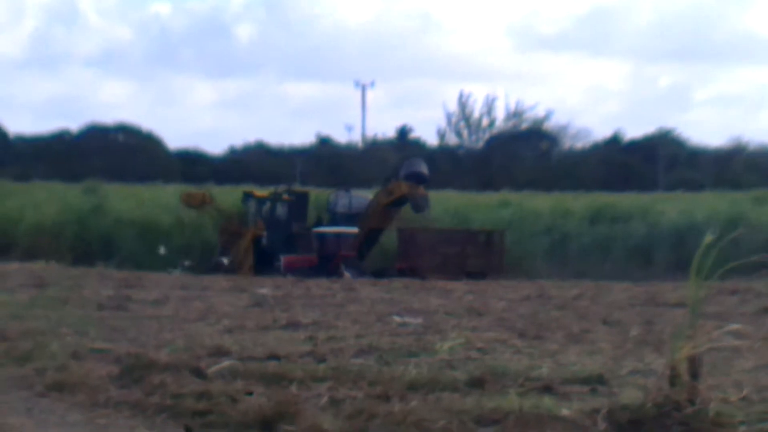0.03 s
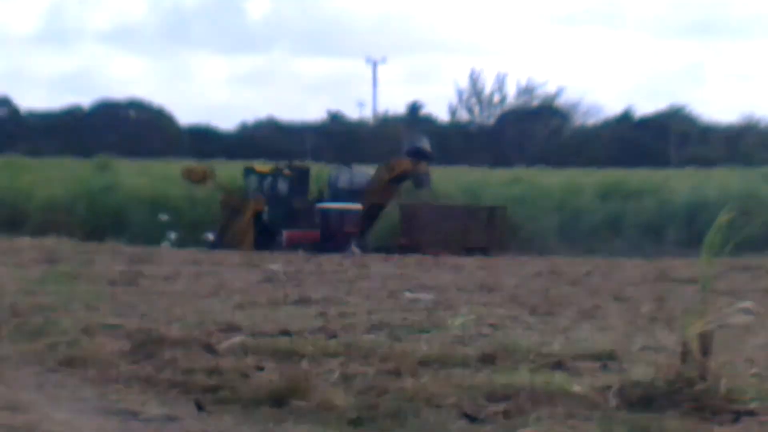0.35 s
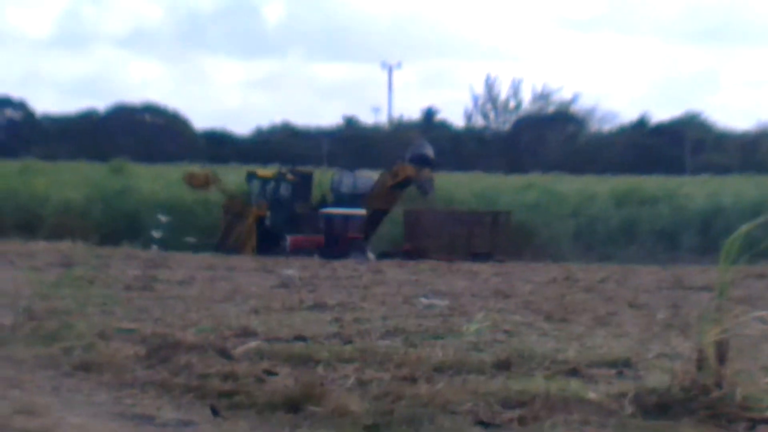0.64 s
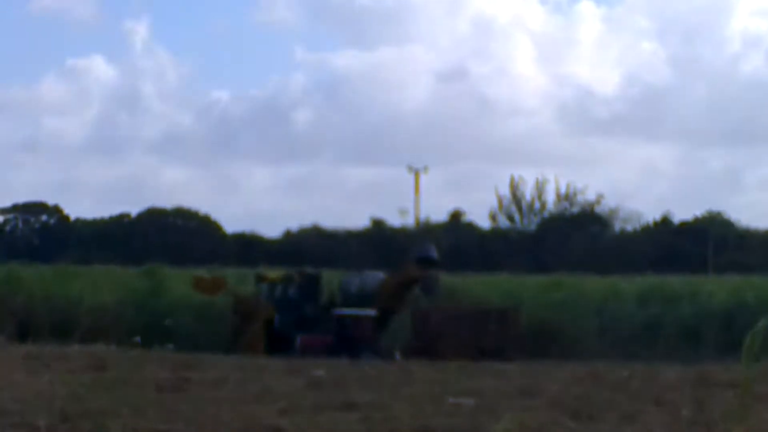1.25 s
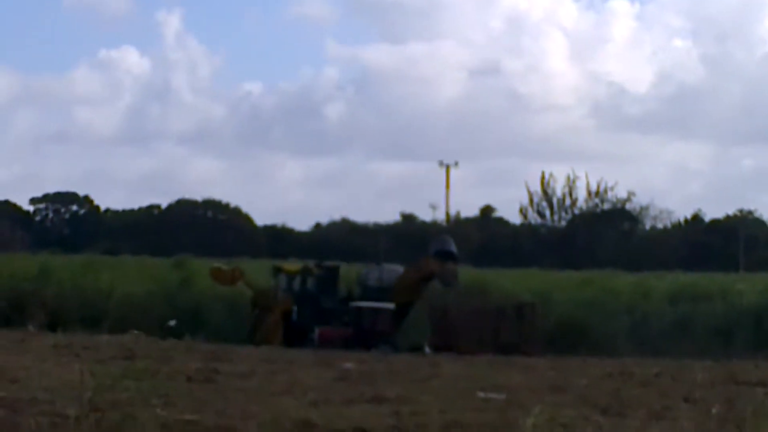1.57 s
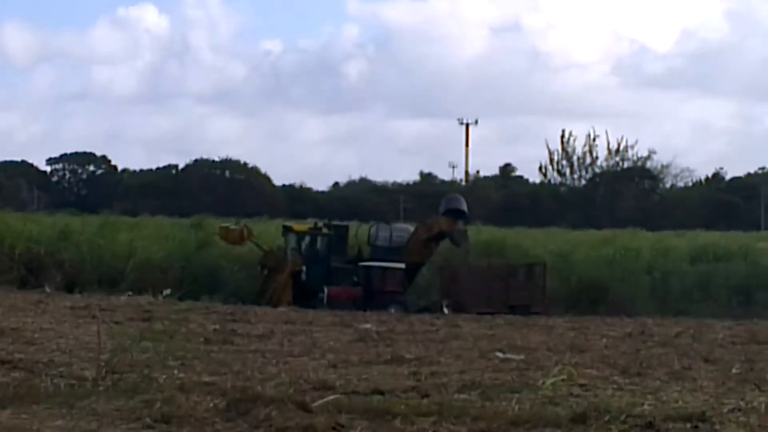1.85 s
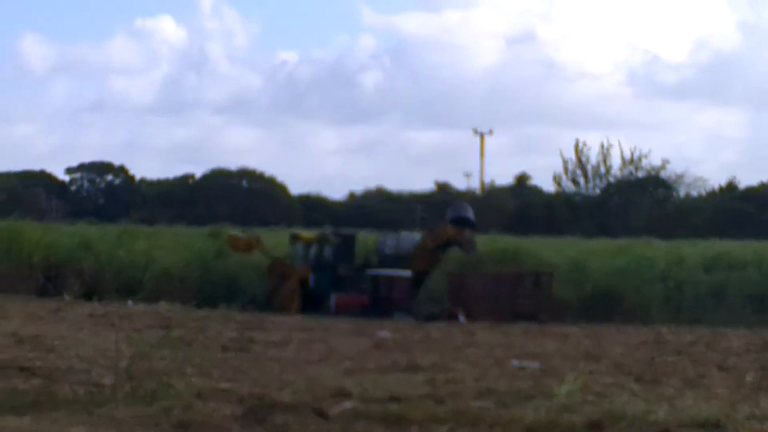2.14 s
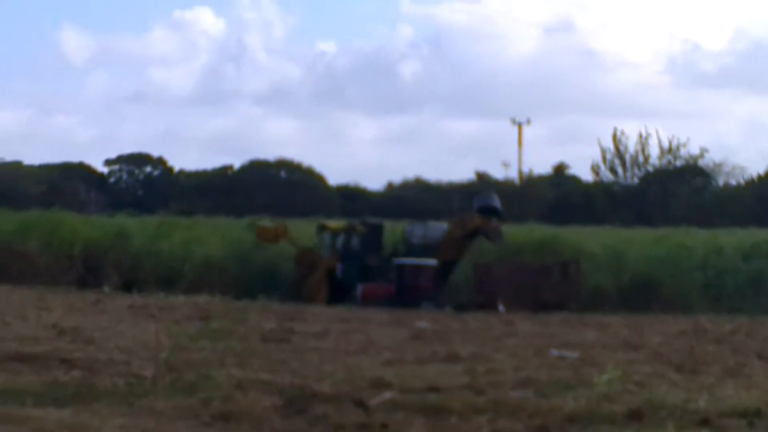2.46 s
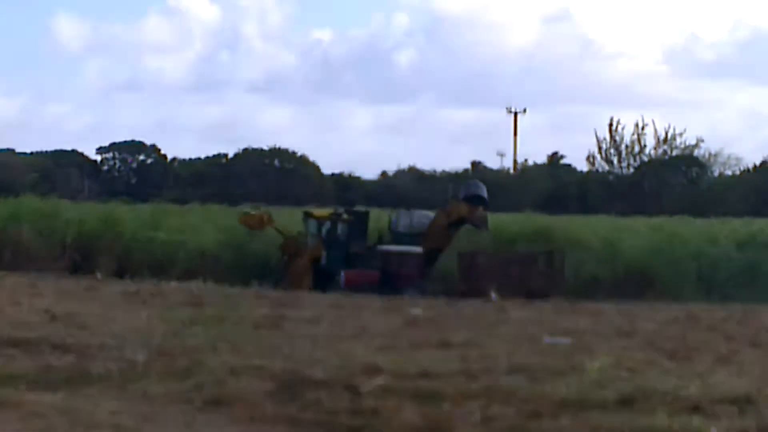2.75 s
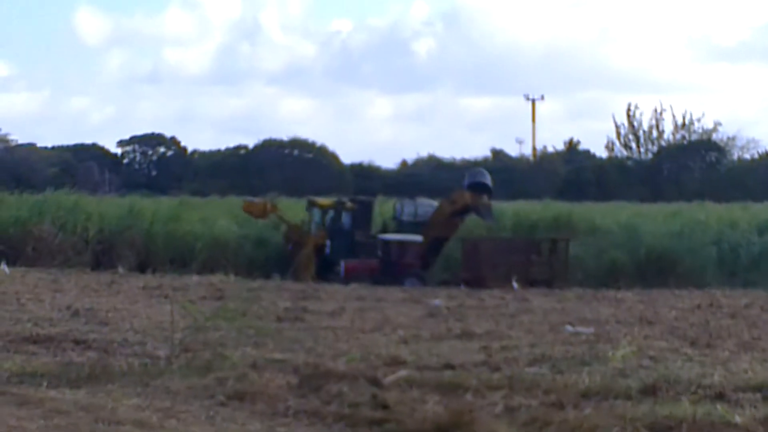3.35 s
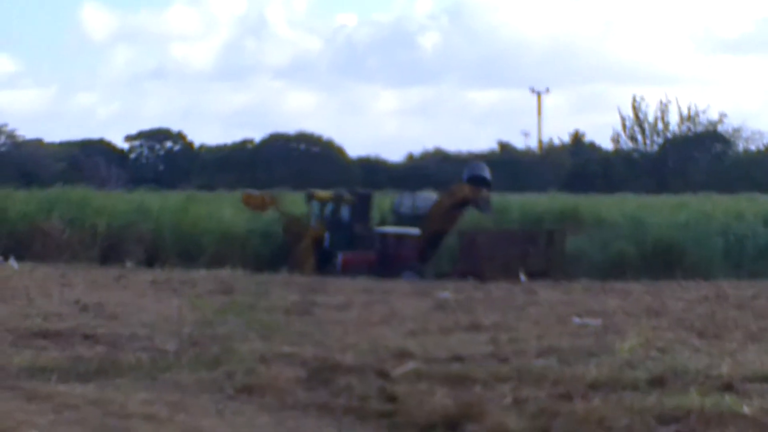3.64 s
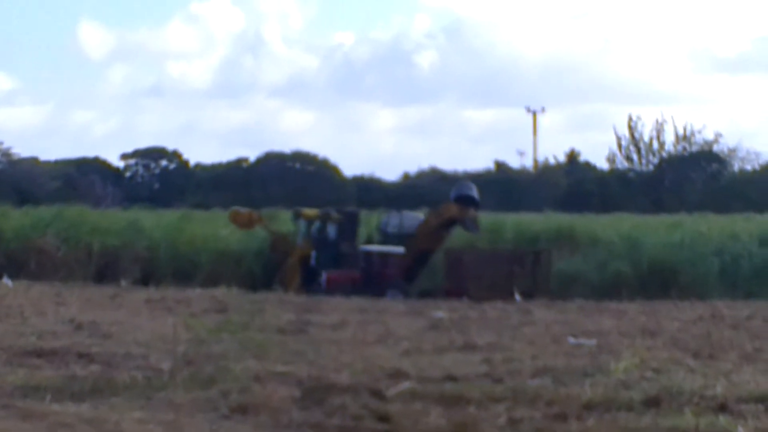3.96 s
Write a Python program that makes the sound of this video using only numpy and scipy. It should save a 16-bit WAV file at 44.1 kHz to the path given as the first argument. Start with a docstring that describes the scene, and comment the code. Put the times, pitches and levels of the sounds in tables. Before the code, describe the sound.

Wind sputters and thumps on the microphone while diesel farm machines drone far across a field.

```python
"""From the start, gusty wind buffets the microphone: a stream of eddies, each a short dip of pressure.
Far across the field a cane harvester and a tractor drone throughout: two diesel exhausts, roaring fans,
a thin whine and hissing leaves. The cutters' whirr stands out in the first half second, then sinks back.
A few dry rustles sound close by, the clearest at 1.6 s. From 3 s to the end the wind blows hardest,
and its eddies grow stronger and sharper."""
import sys
import numpy as np
from scipy import signal
from scipy.fft import rfft, irfft, next_fast_len
from scipy.io import wavfile
from scipy.ndimage import uniform_filter1d, map_coordinates

SR = 44100
rng = np.random.default_rng(int(sys.argv[2]) if len(sys.argv) > 2 else 0)


def store_pcm(level_fs):
    """Save levels as 16-bit WAV."""
    pcm = np.round(np.clip(level_fs, -1, 1) * 32767).astype(np.int16)
    wavfile.write(sys.argv[1], SR, np.atleast_2d(pcm).T)


N = 176400

# The bed of wind under the blasts. Each row: time in seconds, level in dB before its trim.
WIND_BED = [(0.0, -26.5), (0.2, -27), (0.33, -26), (0.46, -26), (0.57, -31.5), (0.67, -30), (0.76, -26),
            (0.97, -30.5), (1.15, -33), (1.36, -27.5), (1.48, -32), (1.74, -31), (1.95, -28.5),
            (2.15, -36.5), (2.45, -28), (2.86, -34.5), (2.95, -37.5), (3.0, -23.5), (3.03, -27.5),
            (3.1, -20.5), (3.24, -19.5), (3.285, -30.5), (3.35, -21), (3.42, -25), (3.47, -21.5),
            (3.62, -22), (3.68, -23.5), (3.79, -26), (3.84, -25.5), (3.95, -19.5), (4.0, -24)]
# Single blasts. Each row: peak time in seconds, swell level in dB before its trim, length in seconds,
# sharpness of the small eddies in Hz, depth of the core eddy in dB before the microphone colours it.
BLASTS = [(0.063, -21.5, 0.003, 500, -10.5), (0.089, -27.5, 0.007, 453, -23),
          (0.115, -35, 0.0053, 311, -5.5), (0.175, -32, 0.03, 448, -9), (0.18, -25.5, 0.015, 480, -13),
          (0.209, -22.5, .014, 325, -9), (0.227, -29.5, 0.0049, 484, -12), (0.274, -27.5, .008, 417, -19.5),
          (0.289, -29, 0.017, 405, -23), (0.33, -28.5, 0.022, 246, -16), (0.367, -31, 0.015, 330, -22),
          (0.405, -28.5, 0.018, 412, -26), (0.426, -20.5, 0.0041, 544, -7), (0.441, -21, 0.018, 270, -8),
          (0.449, -26.5, 0.0028, 485, -12), (0.489, -24.5, 0.0069, 474, -14),
          (0.517, -25.5, 0.0057, 483, -13.5), (0.541, -20.5, .008, 233.5, -16.5),
          (0.625, -23.5, 0.017, 271, -13), (0.698, -15, 0.011, 262, -21), (0.707, -18.5, .012, 448, -17),
          (0.716, -25, 0.007, 310, -13.5), (0.729, -25, 0.012, 450, -6.5),
          (0.741, -18.5, 0.009, 409, -14.5), (0.767, -28.5, 0.015, 406, -11), (0.789, -24, .014, 325, -27),
          (0.827, -19.5, 0.0044, 480, -16.5), (0.873, -23.5, 0.0065, 443, -15),
          (0.918, -30, 0.021, 556, -29), (1.18, -25.5, 0.0069, 446, -14), (1.263, -28, 0.037, 301, -25),
          (1.331, -29.5, 0.011, 480, -18), (1.355, -25, 0.0041, 610, -14.5), (1.391, -23, .018, 303, -20),
          (1.547, -20, .012, 536, -12.5), (1.868, -16, 0.015, 412, -10.5), (1.927, -20, 0.021, 424, -24.5),
          (1.97, -19, .012, 377, -14), (1.996, -22, 0.015, 425, -17.5), (2.093, -30.5, 0.016, 340, -11),
          (2.238, -25, 0.0097, 153, -12.5), (2.325, -24.5, 0.022, 343, -11), (2.349, -19, 0.0065, 404, -27),
          (2.428, -28.5, 0.035, 475, -33), (2.519, -26, 0.021, 220, -17), (2.598, -23, 0.016, 262, -9.5),
          (2.677, -22, .007, 515, -15), (2.704, -15, 0.012, 326, -3), (2.748, -30.5, 0.02, 440, -26),
          (2.907, -25, 0.0076, 430, -20.5), (2.965, -21.5, 0.0044, 258, -8.5),
          (2.984, -18, 0.018, 432, -24.5), (3.043, -17, .008, 1220, -20.5),
          (3.049, -16.5, 0.0035, 534, -15), (3.06, -18.5, .012, 910, -18.5),
          (3.113, -17.5, 0.024, 552, -14), (3.132, -19, 0.0056, 251, 2), (3.137, -12.5, 0.0054, 624, -13.5),
          (3.153, -22, 0.0036, 747, -8), (3.173, -23, 0.0052, 282, -3), (3.18, -11, 0.0088, 795, -19.5),
          (3.194, -17, 0.0053, 640, -8), (3.271, -17, 0.0083, 600, -19), (3.303, -14, 0.011, 450, -10.5),
          (3.336, -16, 0.011, 331, -7.5), (3.375, -20, 0.01, 572, -18.5), (3.397, -9, 0.006, 620, -11.5),
          (3.444, -17.5, .012, 564, -19), (3.469, -18, .011, 800, -6.5), (3.512, -23, 0.029, 453, -17.5),
          (3.555, -12, 0.0073, 329, -5), (3.569, -10.5, 0.0056, 794, -22.5), (3.591, -14, 0.0084, 514, -16),
          (3.651, -16, 0.011, 524, -14.5), (3.658, -10, 0.0093, 566, -13.5), (3.674, -10, 0.0053, 277, -7),
          (3.690, -17.5, .006, 950, -3), (3.726, -7.5, 0.0069, 505, -6), (3.752, -22, .016, 408, -18),
          (3.811, -18, 0.01, 398, -13), (3.834, -20, 0.023, 597, -12.5), (3.861, -14, 0.0065, 835, -15),
          (3.882, -18, 0.0049, 403, -5), (3.894, -16.5, 0.0045, 480, -15), (3.919, -15.5, 0.01, 850, -5.5),
          (3.973, -16.5, 0.01, 520, -11)]
EDDY_HZ, EDDY_REF_DB, DB_PER_OCTAVE = 312, -25.5, 6  # sharpness at this bed level; more wind sharpens it


def wind(bed_trim_db=-2, swell_trim_db=-0.5, ceiling=0.53, core_sharpness=0.8):
    """The flow sets how strong and sharp the eddies are; a blast is a swell round one broader core eddy."""
    t, bed_db = clock(), curve(WIND_BED)
    power = amp(bed_db + bed_trim_db) ** 2
    weighted_octaves = power * (np.log2(EDDY_HZ) + (bed_db - EDDY_REF_DB) / DB_PER_OCTAVE)
    for peak_s, db, length, hz, _ in BLASTS:
        swell = amp(db + swell_trim_db) ** 2 * bell(peak_s, length)
        power += swell
        weighted_octaves += swell * np.log2(hz)
    flow_db = 10 * np.log10(power)
    buffeting = amp(flow_db) * eddy_stream(weighted_octaves / power) + rumble(bed_db, flow_db)
    peak_times, _, _, blast_hz, core_db = np.transpose(BLASTS)
    cores = eddies(peak_times, core_sharpness * blast_hz, amp(core_db))
    return ceiling * np.tanh(buffeting / ceiling) + cores


def eddy_stream(log2_hz, per_s=950, spread_octaves=0.37, scatter_db=3, even_s=0.019, even_share=0.59):
    """Small eddies arrive at random, their sharpness scattered round the curve log2_hz; rms 1."""
    t = clock()
    chance = rng.standard_normal((8000, 4))
    gaps = (chance[:, 0] ** 2 + chance[:, 1] ** 2) / 2  # exponential waits of mean 1
    times = np.cumsum(gaps) / per_s
    size, strength = chance[times < t[-1], 2:].T
    times = times[times < t[-1]]
    sharp_hz = 2 ** (spread_octaves * size + np.interp(times, t, log2_hz))
    stream = eddies(times, sharp_hz, amp(scatter_db * strength))
    # Even out the loudness over about 20 ms, so the sputter stays steady and the blasts make the accents.
    local_rms = np.sqrt(np.abs(uniform_filter1d(stream ** 2, int(even_s * SR))) + 1e-9)
    flutter = amp(1.5 * wobble(60))
    return unit(stream / local_rms ** even_share * flutter)


# The tone of wind on the microphone. Each row: frequency in Hz, gain in dB.
WIND_EQ = [(25, -12), (70, -2), (150, 2), (300, 0.5), (550, 3), (1000, 1.5), (1800, -2.5), (3000, -9),
           (6000, -27.5)]


def eddies(times, sharp_hz, depth, port_hz=79.5):
    """Bell-shaped dips of pressure, heard through a microphone port that passes little deep bass."""
    at = np.round(times * SR).astype(int)[:, None] + np.arange(-400, 401)
    lag_s = at / SR - times[:, None]
    dips = -depth[:, None] * np.hanning(at.shape[1]) / (1 + (2 * np.pi * sharp_hz[:, None] * lag_s) ** 2)
    inside = (at >= 0) & (at < N)
    pressure = np.bincount(at[inside], dips[inside], N)
    port = signal.butter(2, port_hz, "high", fs=SR, output="sos")
    return coloured(signal.sosfilt(port, pressure), WIND_EQ)


# The low end of the wind. Each row: frequency in Hz, relative level in dB.
RUMBLE_EQ = [(20, -34), (40, -9.5), (70, 1.5), (130, 0), (190, 0), (300, -15.5), (600, -41), (2000, -72)]


def rumble(bed_db, flow_db, base_db=-30, follow=0.82, blast_share=0.71):
    """Big slow eddies follow the wind less closely and take only part of each blast's swell."""
    slow_db = bed_db + blast_share * (flow_db - bed_db)
    return amp(base_db + follow * (slow_db - EDDY_REF_DB)) * rush(RUMBLE_EQ, patchy_db=1)


# The two diesel engines. Each row: firing rate in Hz, level in dB.
ENGINES = [(118.86, -44), (85.8, -45)]
# The dull tone of a far-off exhaust. Each row: frequency in Hz, relative level in dB.
EXHAUST_EQ = [(30, -22.5), (80, 2.5), (130, 2.5), (250, -3.5), (450, -12.5), (900, -14), (2000, -32.5),
              (4000, -52.5)]


def diesels(drift=0.0072, uneven=0.081, fading_db=1.0):
    """One pulse per firing through each exhaust; the moving air makes the drone fade and return."""
    out = np.zeros(N)
    for firing_hz, db in ENGINES:
        firings = np.cumsum(firing_hz * (1 + drift * wobble(2.5))) / SR
        pulses = np.diff(np.floor(firings), prepend=0) * (1 + uneven * rng.standard_normal(N))
        drone = unit(coloured(pulses - pulses.mean(), EXHAUST_EQ))
        out += amp(db + fading_db * wobble(7.6)) * drone
    return out


# The tone of the working machinery. Each row: frequency in Hz, relative level in dB.
MACHINERY_EQ = [(30, -16), (120, 3), (400, -1.5), (800, -5), (1300, -14), (1700, -23.5), (2000, -25),
                (2500, -23), (3500, -32), (8000, -62)]


def machinery_roar(level_db=-43.5):
    """Fans, tracks and cutters blend into one even roar."""
    return amp(level_db + 1.2 * wobble(5.78)) * rush(MACHINERY_EQ, patchy_db=3.5)


# Close rustles and ticks. Each row: peak time in seconds, level in dB, length in seconds,
# band centre in Hz, band width in octaves.
RUSTLES = [(0.015, -46.5, 0.015, 3800, 0.3), (0.072, -44, 0.0098, 2500, 0.72),
           (0.093, -48, .01, 4160, 0.23), (1.102, -42, 0.014, 2400, 0.68), (1.13, -50, 0.017, 2600, 0.73),
           (1.593, -41.5, 0.0074, 2900, 0.58), (1.597, -42, .003, 6850, 0.16),
           (1.614, -36.5, 0.0027, 5100, 0.092), (1.614, -39.5, 0.0019, 6900, 0.11),
           (1.615, -48, 0.12, 3730, 0.32), (1.603, -54, 0.073, 6960, 0.12), (1.616, -48, 0.1, 1600, 0.46),
           (1.642, -47, 0.008, 3200, 0.36), (1.884, -59.5, 0.081, 5500, 0.39),
           (2.072, -50, 0.072, 3700, 0.36), (2.764, -42, 0.0031, 4330, 0.23)]


def stalk_rustles(crackle_db=3.0):
    """Dry stalks nearby rustle and tick, each a brief swell of crackling noise in one band."""
    out = np.zeros(N)
    for peak_s, db, length, centre_hz, octaves in RUSTLES:
        crackle = rng.standard_normal(N) * amp(crackle_db * wobble(400))
        band = filtered(crackle, lambda hz: np.exp(-0.5 * (np.log2((hz + 1) / centre_hz) / octaves) ** 2))
        out += amp(db) * unit(band) * np.sqrt(bell(peak_s, length))
    return out


# The fader ride shared by hiss and whine. Each row: time in seconds, level in dB before their trims.
HISS_RIDE = [(0.0, -50.5), (0.33, -49.5), (0.5, -52.5), (0.65, -54), (0.8, -52.5), (1.0, -52),
             (1.49, -49.5), (1.74, -53), (1.88, -49), (2.14, -53), (2.35, -55), (2.75, -52.5), (3.06, -48),
             (3.28, -48.5), (3.5, -47), (3.66, -52), (3.8, -53), (4.0, -48.5)]
# The tone of dry leaves and stalks. Each row: frequency in Hz, relative level in dB.
HISS_EQ = [(300, -16.5), (1400, -2.5), (2000, -1.5), (2400, -8), (2950, -6.5), (3200, -1), (3700, -1),
           (4400, -5), (5100, -12.5), (5850, -20.5), (6500, -13.5), (7200, -13), (8000, -22.5),
           (8700, -36.5), (9500, -35), (15000, -62.5)]


def leaf_hiss(trim_db=1.5, grain_db=0.5):
    """Dry cane gives a grainy hiss that fades and returns."""
    level_db = curve(HISS_RIDE) + trim_db + 0.9 * wobble(22)
    grainy = rush(HISS_EQ, patchy_db=1.36) * amp(grain_db * wobble(350))
    return amp(level_db) * unit(grainy)


# The whirr's twin peaks near 2 kHz. Each row: frequency in Hz, relative level in dB.
WHIRR_EQ = [(1500, -51), (1850, -15), (1945, 3), (2000, -12.5), (2060, 5), (2150, -12), (2260, -26),
            (2600, -53.5)]
# The whirr's fader ride. Each row: time in seconds, level in dB.
WHIRR_RIDE = [(0, -53), (.08, -51), (.18, -55.5), (.3, -47.5), (.55, -60), (1.3, -62.5), (2.1, -61),
              (2.6, -68), (4, -61)]


def cutter_whirr():
    """The cutters whirr in a narrow, wavering band of noise."""
    return amp(curve(WHIRR_RIDE) + 1.4 * wobble(12)) * rush(WHIRR_EQ, patchy_db=-4.5)


# The whine's narrow band near 3.6 kHz. Each row: frequency in Hz, relative level in dB.
WHINE_EQ = [(3300, -49), (3500, -21.5), (3556, -0.5), (3620, -5), (3706, -2), (3780, -12), (4000, -49)]


def harvester_whine(trim_db=-10):
    """The harvester's thin whine sits under the hiss, fading and returning with it."""
    return amp(curve(HISS_RIDE) + trim_db) * rush(WHINE_EQ, patchy_db=-1.5)


def reflected(x, ripple_hz=457, share=0.082):
    """A surface close to the microphone adds one weak, late copy that ripples the spectrum."""
    return filtered(x, lambda hz: 1 + share * np.exp(-2j * np.pi * hz / ripple_hz))


def amp(db):
    """Decibels as a gain."""
    return 10 ** (np.asarray(db) / 20)


def unit(x):
    """x scaled to rms 1."""
    return x / np.sqrt(np.mean(x ** 2) + 1e-20)


def clock():
    """The time of every sample in seconds."""
    return np.arange(N) / SR


def curve(rows):
    """Rows of time and value joined by straight lines."""
    return np.interp(clock(), *np.transpose(rows))


def bell(peak_s, length_s):
    """A smooth swell to 1, length_s wide at half height."""
    return np.exp(-np.log(2) * (2 * (clock() - peak_s) / length_s) ** 2)


def wobble(rate):
    """A smooth random curve, rate knots a second."""
    return map_coordinates(rng.standard_normal(2048), [clock() * rate], mode="wrap")


def filtered(x, response):
    """x through a response given as a function of Hz."""
    size = next_fast_len(N + SR // 2)
    return irfft(rfft(x, size) * response(np.fft.rfftfreq(size, 1 / SR)), size)[:N]


def coloured(x, eq):
    """x through an EQ curve, its points joined on a log frequency axis."""
    points_hz, db = np.transpose(eq)
    return filtered(x, lambda hz: amp(np.interp(np.log(hz + 1), np.log(points_hz + 1), db)))


def rush(eq, patchy_db):
    """Coloured noise of rms 1 with patches of random gain across time and frequency."""
    spectra = signal.stft(rng.standard_normal(N), nperseg=512)[2]
    patches = uniform_filter1d(rng.standard_normal(spectra.shape), size=6, axis=0)
    patches = uniform_filter1d(patches, size=14, axis=1)
    noise = signal.istft(spectra * amp(patchy_db * unit(patches)), nperseg=512)[1][:N]
    return unit(coloured(noise, eq))


def scene():
    """Wind up front, the machines and the cane behind it, in mono."""
    machines = machinery_roar() + cutter_whirr() + harvester_whine() + diesels()
    field = machines + leaf_hiss() + stalk_rustles()
    return (wind() + reflected(field))[None]


def record(dry, treble_hz=8839, clip_at=0.7, self_noise_db=-92.5, band_limit_hz=15655):
    """The microphone is dull on top, clips any blast that overloads it and adds a faint hiss."""
    dull = filtered(dry[0], lambda hz: 1 / np.sqrt(1 + (hz / treble_hz) ** 50))
    clipped = np.clip(dull, -clip_at, clip_at)
    noisy = clipped + amp(self_noise_db) * rng.standard_normal(N)
    return filtered(noisy, lambda hz: hz < band_limit_hz)[None]


dry = scene()
out = record(dry)
store_pcm(out)
```